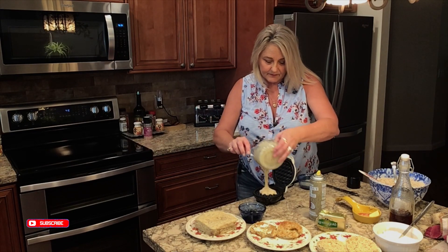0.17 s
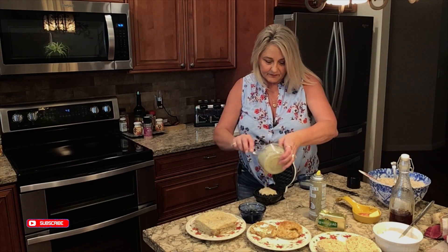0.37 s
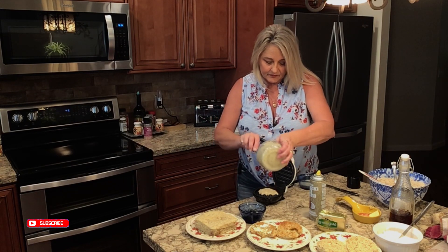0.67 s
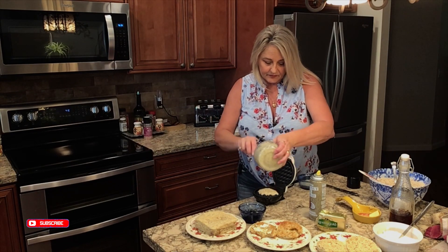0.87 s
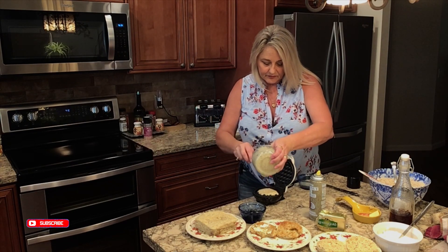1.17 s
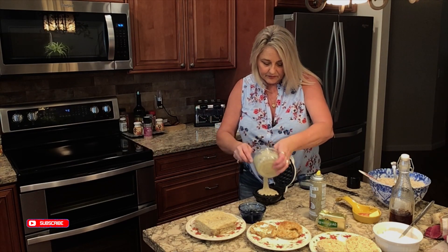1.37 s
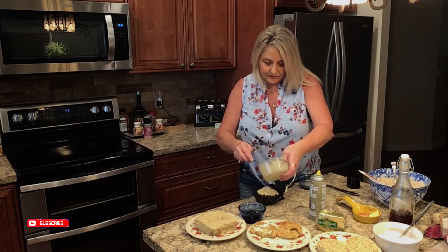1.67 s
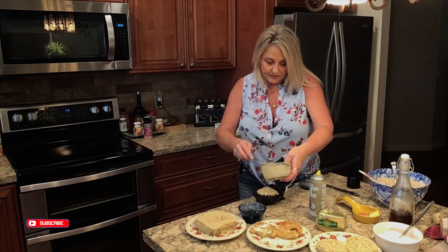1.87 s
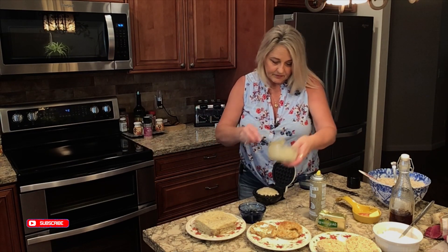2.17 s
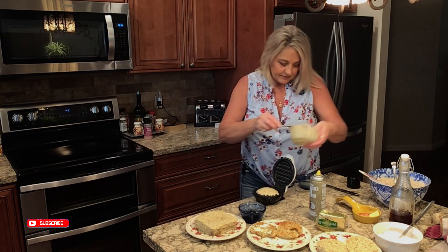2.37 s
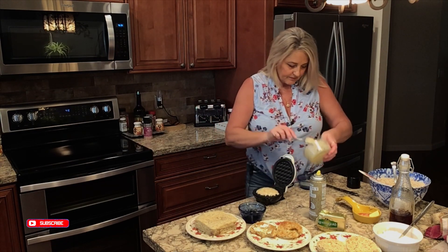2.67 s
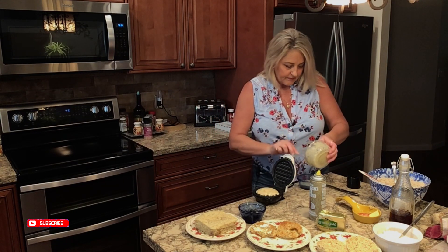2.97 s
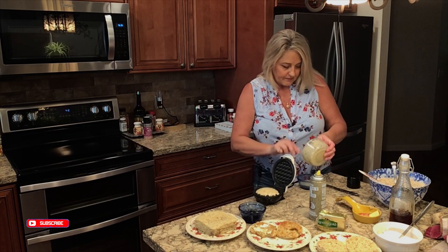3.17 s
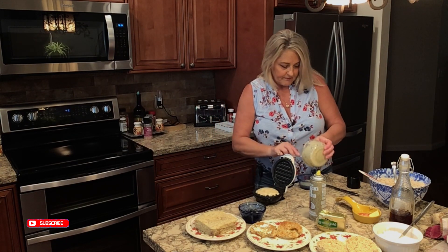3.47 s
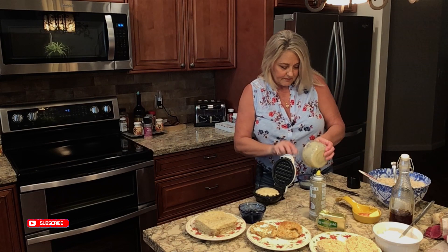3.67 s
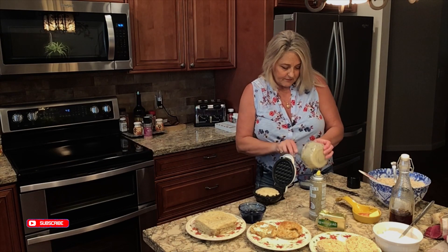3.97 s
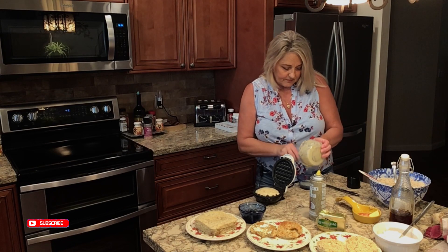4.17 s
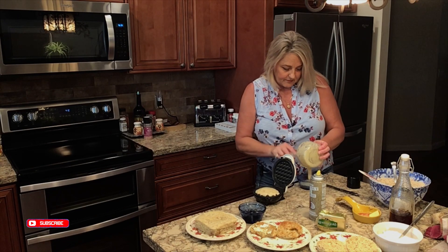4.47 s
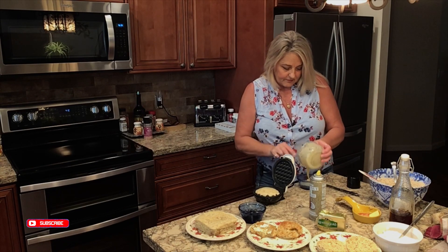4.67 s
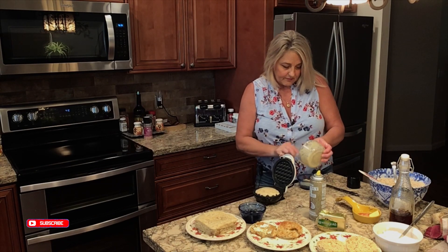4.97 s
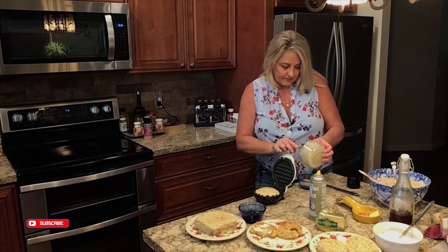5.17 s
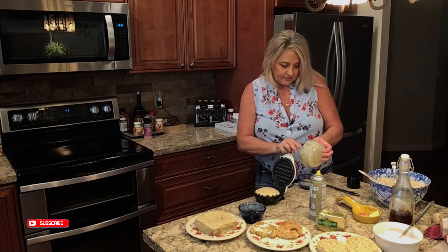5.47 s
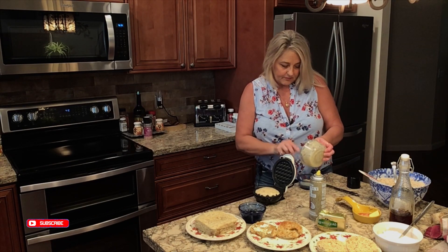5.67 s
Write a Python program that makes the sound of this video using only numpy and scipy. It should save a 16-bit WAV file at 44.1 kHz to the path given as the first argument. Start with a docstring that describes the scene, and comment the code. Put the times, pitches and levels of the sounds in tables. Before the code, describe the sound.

In a kitchen with a low rumble, an appliance hum and a faintly sizzling hot iron, batter is scraped out of a hand-held glass bowl. The spoon starts with quiet squelches and small ticks against the glass, then breaks into uneven clusters of sharp clinks mixed with wet scrapes. The glass rings only briefly, the hard room adds a short tail, and the strongest hits overload the microphone.

```python
"""A soft, wet scrape over appliance hum, low air rumble and the faint sizzle of a hot iron.
A steel spoon is working round a small hand-held glass bowl lined with batter: its edge slips on the glass,
the batter squelches, and each knock rings the bowl, lightly at first, then harder and busier.
Hand and batter damp the glass, so the hard kitchen carries the tail. The loudest clinks overload and clip."""
import sys
import numpy as np
from scipy import signal
from scipy.fft import rfft, irfft, next_fast_len
from scipy.io import wavfile

SR = 44100
rng = np.random.default_rng(int(sys.argv[2]) if len(sys.argv) > 2 else 0)


def inscribe(sig):
    """Save sig as 16-bit PCM at rate SR to the path in sys.argv[1].

    A 1-D sig is mono; a 2-D sig holds one channel per row.
    Samples are clipped to [-1, 1] before scaling.
    """
    pcm = np.round(np.clip(np.atleast_2d(sig).T, -1, 1) * 32767)
    wavfile.write(sys.argv[1], SR, pcm.astype(np.int16))


N = 257103


def gain_of(db):
    """Decibels to a gain."""
    return 10 ** (np.asarray(db) / 20)


def unit_rms(x):
    """Scales to rms 1."""
    return x / np.sqrt(np.mean(x ** 2) + 1e-20)


def curve_at(points, hz):
    """Reads a curve on a log-frequency axis."""
    f, value = np.transpose(points)
    return np.interp(np.log(hz + 1), np.log(f + 1), value)


def add(mix, start, sound):
    """Mixes a sound in, start seconds along."""
    part = mix[round(start * SR):][:len(sound)]
    part += sound[:len(part)]


def coloured_noise(colour):
    """Steady noise at rms 1, shaped by (frequency [Hz], relative level [dB]) points."""
    size = next_fast_len(N)
    shape = gain_of(curve_at(colour, np.fft.rfftfreq(size, 1 / SR)))
    return unit_rms(irfft(rfft(rng.standard_normal(size)) * shape, size)[:N])


def resonate(x, hz, width_hz):
    """A resonance that can glide: shifts hz down to zero, smooths, and shifts back."""
    carrier = np.exp(2j * np.pi * np.cumsum(hz * np.ones(len(x))) / SR)
    pole = np.exp(-np.pi * width_hz / SR)
    return 2 * (carrier * signal.lfilter([1 - pole], [1, -pole], x / carrier)).real


def scrapes(slips_per_s=500, pops_per_s=150, press_share=0.21, lift_db=-8):
    """Tiny slips of the spoon edge make the glass hum; wet pops of batter sound in the bowl's hollow."""
    # Strokes through batter: (start [s], length [s], squelch [dB], its first pitch [Hz], last pitch [Hz],
    # rim hum [dB], its pitch [Hz], upper ring [dB], its pitch [Hz], wet hiss [dB])
    strokes = [(0.0, 0.042, -48.5, 864, 1030, -46, 1660, -57.5, 3030, -68),
               (.23, 0.1, -55.5, 1020, 1090, -65, 1840, -71, 3170, -61),
               (.48, 0.11, -39.5, 1150, 1135, -54, 1830, -50.5, 3610, -72),
               (0.589, 0.17, -49.5, 1190, 1180, -53.5, 1950, -51, 3590, -72),
               (0.786, 0.12, -57, 890, 940, -60, 1950, -59, 3270, -68),
               (1.248, 0.06, -50.5, 1010, 980, -51, 1760, -49.5, 3400, -56),
               (1.33, .13, -55.5, 1070, 1090, -54, 1700, -56, 3370, -72),
               (1.499, 0.18, -73, 1040, 1050, -61, 1640, -63, 3340, -75),
               (1.658, 0.074, -62, 1100, 1040, -57, 1680, -60.5, 3490, -84),
               (1.98, 0.13, -57.5, 1220, 1250, -66, 1650, -64, 3400, -65),
               (2.19, 0.12, -53, 1260, 1280, -63, 1760, -57, 3500, -72),
               (4.041, 0.016, -27, 1210, 1155, -32, 1810, -49, 3460, -50),
               (4.061, 0.013, -31, 1210, 1180, -53, 1740, -50, 3500, -53.5),
               (4.08, 0.061, -38.5, 1170, 940, -47, 1690, -59, 3470, -51),
               (4.14, 0.11, -44.5, 1070, 980, -48.5, 1780, -49.5, 3470, -50.5),
               (5.242, 0.081, -47, 1070, 1090, -63, 1760, -44.5, 2470, -42),
               (5.496, 0.04, -36, 500, 1420, -69, 1550, -75, 3400, -60),
               (5.539, 0.023, -23.5, 1020, 1120, -58, 1600, -49, 3350, -40),
               (5.555, 0.057, -37, 790, 500, -70, 1700, -57, 3520, -37)]
    # Wet hiss: (frequency [Hz], relative level [dB])
    hiss_colour = [(2000, -28), (4500, 3), (6500, 3), (8500, 3), (11000, -11), (14000, -30)]
    out = np.zeros(N)
    for start, length, squelch_db, from_hz, to_hz, rim_db, rim_hz, upper_db, upper_hz, hiss_db in strokes:
        progress = np.arange(0, length, 1 / SR) / length
        n = len(progress)
        pressure = np.minimum(progress / press_share, 1)
        pressure *= gain_of(lift_db * progress ** 2) * np.minimum((1 - progress) / .1, 1)  # spoon lifts
        slip_draw, slip_size, pop_draw, pop_size = rng.random((SR // 2, 4))[:n].T
        noise = rng.standard_normal(SR // 2)[:n]
        slips = unit_rms((slip_draw < slips_per_s / SR) * (slip_size - .5)) + 0.5 * noise
        rim = resonate(resonate(slips, rim_hz, 200), rim_hz, 570)
        upper = resonate(resonate(slips, upper_hz, 130), upper_hz, 650)
        upper += gain_of(-4.5) * resonate(resonate(slips, 5660, 250), 5060, 540)  # the next ring up
        pops = unit_rms((pop_draw < pops_per_s / SR) * (pop_size - .5)) + 1.9 * noise
        hollow_hz = from_hz + (to_hz - from_hz) * progress
        squelch = resonate(resonate(pops, hollow_hz, 75), hollow_hz, 340)
        hiss = coloured_noise(hiss_colour)[:n]
        layers = [(squelch_db, squelch), (rim_db, rim), (upper_db, upper), (hiss_db, hiss)]
        add(out, start, pressure * sum(gain_of(db) * unit_rms(x) for db, x in layers))
    return out


def appliance_hum(waver=0.16):
    """Three steady pitches whose level wavers together."""
    # Hum tones: (frequency [Hz], rms level [dB])
    tones = [(59, -49.5), (118, -59.5), (505, -60.5)]
    t = np.arange(N) / SR
    drift = coloured_noise([(1, -10), (6, -3), (12, -72.5)])
    hum = sum(gain_of(db) * np.sqrt(2) * np.sin(2 * np.pi * (hz * t + rng.random())) for hz, db in tones)
    return hum * (1 + waver * drift)


def iron_sizzle():
    """A hot iron sizzles: a thin band of treble noise that swells and fades."""
    # Swells: (time [s], level [dB])
    swells = [(0.0, -56.5), (0.36, -61), (0.49, -53), (0.65, -46.5), (0.73, -43.5), (0.93, -57.5),
              (1.48, -58.5), (1.91, -56.5), (2.46, -60.5), (2.69, -54), (2.9, -53), (4.3, -59), (5.2, -60),
              (5.8, -68)]
    # Sizzle tone: (frequency [Hz], relative level [dB])
    colour = [(4000, -21), (6000, -18), (7000, -9), (8200, -13.5), (9000, -20.5), (11000, -45)]
    return gain_of(np.interp(np.arange(N) / SR, *np.transpose(swells))) * coloured_noise(colour)


def air_rumble(level_db=-31.5):
    """Room air: a deep rumble with a little hiss on top."""
    # Room tone: (frequency [Hz], relative level [dB])
    colour = [(3, 2), (18, 3), (25, -10), (31, -20.5), (60, -20.5), (84, -31.5), (118, -27.5), (146, -29.5),
              (281, -32.5), (506, -31), (667, -36), (1240, -40), (2090, -51), (7760, -58), (10500, -60),
              (15500, -71.5)]
    return gain_of(level_db) * coloured_noise(colour)


def clinks(spot_db=4.0, modes_db=-2, glass_gain_db=3, clack_db=-6, patch_db=-1, ripple_db=2.5):
    """Each blow rings the glass, with a dry clack of steel and two brief notes from the struck patch."""
    # Spoon on glass: (time [s], blow [dB], knock [dB], rim ring [dB], second ring [dB], tick [dB],
    # two patch notes [Hz], freedom of the glass to ring [dB]); levels after the blow are relative to it
    blows = [(0.398, -51, -9, 2, -6, -20, 3270, 6000, -14),
             (0.4825, -20.5, -21, -13, -3, -40, 3550, 5730, -22.5),
             (0.621, -34, -8, -27, -8, -35, 3280, 5640, -13.5),
             (0.6623, -42.5, -5, -16, -6, -23, 3420, 5630, -11),
             (0.7185, -43, -9, -18, 1, -25, 4200, 6500, -13),
             (0.767, -17.5, -30, -32, -6.5, -26, 3390, 7220, -34),
             (0.7711, -22, -17, -17.5, 7.5, -19, 3250, 6000, -18.5),
             (0.9356, -33, -23, -34, -9, -33, 4760, 3500, -29),
             (1.209, -58, -3, -6, 9, -22, 3630, 5670, -15),
             (1.2523, -36, -16, -22, -8, -7, 3320, 7800, -24.5),
             (1.4783, -40.5, -10, 7.5, -1, -36, 3400, 5370, -16),
             (1.578, -52, -4, -3, 6, -23, 3250, 5600, -15), (2.266, -53, -6, 1, 2, -19, 3520, 6230, -9),
             (2.369, -54, 3, 0, 5, -19, 3450, 5530, -10),
             (2.3844, -44.5, -12, 1.5, 7, -19, 3350, 5550, -15),
             (2.709, -5.5, -14, -18, -7.5, -26, 5510, 5700, -18),
             (2.7154, -12.5, -22, -6.5, -4.5, -36, 3940, 5700, -7.5),
             (2.807, -14, -6, -11, 6, 1.5, 4980, 5900, -29),
             (2.8161, -19.5, -12, -24, -13, -19, 5070, 5800, -21),
             (2.8249, -41, 4, -14, -6, 4, 4930, 5350, 3), (2.8592, -7, -26, -57, -6, -5, 3840, 6260, -35.5),
             (2.8658, -14.5, -14.5, -28, 0, -33, 3910, 6100, -17.5),
             (3.0871, 7, -39, -13.5, -8.5, -31, 3420, 6050, -19),
             (3.1, 0.5, -28, -19, -6.5, -4, 3520, 6050, -10.5),
             (3.3951, -13, -11, -46.5, -11, -2.5, 4830, 5230, -18),
             (3.4016, -15.5, -20.5, -34.5, -3.5, -7.5, 4360, 6200, -37.5),
             (3.436, -33.5, -18.5, -31, -12, -6, 4340, 6550, -15),
             (3.4614, -13, -32.5, -34.5, -18, -14.5, 4930, 6720, -36),
             (3.4762, -23, -15, -21, 5, -12, 4470, 7600, -39),
             (3.617, 4, -30, -13.5, -25.5, -32.5, 4100, 5360, -3.5),
             (3.6208, 1, -38.5, -16, -27, -22, 7980, 5420, -12.5),
             (3.7283, 8.5, -14, -36, -7.5, -9.5, 5496, 6870, -13.5),
             (3.7306, -4, -11.5, -7.5, -8, -30.5, 3550, 7010, -7.5),
             (3.7421, 1.5, -33.5, -17.5, -21, -36.5, 3660, 5530, -18),
             (3.869, -24.5, -39, -32.5, -15, -1, 7600, 8850, -25),
             (3.9384, 8, -28, -23.5, -8.5, -14, 7944, 5806, -14.5),
             (4.0056, -3.5, -41, -25, -12.5, -41.5, 3790, 5600, -29),
             (4.021, -13, -28.5, -20, -14, -12, 3380, 7540, -24),
             (4.46, -16, -38, -29.5, -7.5, 4, 4300, 7000, -31),
             (4.488, -39, -1, -11, -12, -19.5, 4280, 6000, -23),
             (4.542, -25.5, -27.5, -35, -16, 5, 2800, 7700, -24.5),
             (4.556, -12.5, -15, -38, 2, 1.5, 5030, 6100, -33.5),
             (4.5612, -24, -9, -55, -8.5, -30, 2840, 5240, -6.5),
             (4.566, -35, -29, -43.5, -10, -15, 5030, 5500, -17),
             (4.6223, -15.5, -29, -27, -0.5, -7, 9000, 6950, -21.5),
             (4.633, -19, -26, -42, -1, -6, 4520, 7200, -32),
             (4.815, 7, -28.5, -18.5, -6.5, -19, 3290, 7950, -19),
             (4.8262, -13.5, -40, 0, -24.5, -32, 5430, 7900, -26),
             (4.8965, -26, -9, -16, 0, 9, 4970, 8260, -11),
             (5.2162, -7, -10, -27, -5, 0, 4750, 7950, -24.5),
             (5.2215, -11, 0, -27, 2.5, 5, 2540, 5040, -30.5),
             (5.3471, -6.5, -26.5, -47, -7.5, -3, 3540, 7260, -36),
             (5.465, -20, -6, -21, 2, 10, 5000, 6400, -22.5),
             (5.4776, -12.5, -7.5, -25.5, -6, -10, 4800, 8600, -24),
             (5.6129, -5, -20, -68, -6, -2.5, 3400, 6340, -26),
             (5.6235, -7, -39, -53, -16, -27, 3440, 6900, -25),
             (5.638, -24, -30, -43, -3, 0, 4430, 6600, -29),
             (5.763, -11, -3, -36, -17.5, 2, 4680, 6650, -20),
             (5.817, -33, -30, -18, -5, -10, 2520, 5800, -29),
             (5.8202, -8, -27, -22, -0.5, -13, 3430, 5840, -21),
             (5.826, -14.5, -25, -17, 0, -9, 3400, 8100, -14.5)]
    # Tone bands of a blow: (thud, knock, rim, clack, second ring, blow, upper rings, tick) [Hz]
    band_hz = [250, 900, 1670, 2500, 3600, 5800, 7700, 11000]
    # Modes of bowl and spoon: (frequency [Hz])
    mode_hz = [190, 350, 520, 720, 1050, 1670, 2500, 3315, 3580, 3830, 4200, 4900, 5310, 5415, 5590, 5895,
               6105, 6300, 6870, 7870, 8150, 8280]
    # Ring of each mode: (relative level [dB], base t60 [s])
    mode_ring = [(0.5, 0.032), (9, 0.029), (3, 0.042), (-5.5, 0.042), (10.5, 0.015), (5, 0.053),
                 (3.5, 0.033), (14, 0.025), (4, 0.021), (0.5, 0.035), (5.5, 0.033), (4, 0.023),
                 (-2.5, 0.0076), (8, 0.031), (-2.5, 0.031), (18, 0.0081), (-3, 0.019), (4, 0.017),
                 (2.5, 0.02), (6, 0.017), (12, 0.021), (1, 0.011)]
    hz = np.array(mode_hz)
    mode_db, mode_t60 = np.transpose(mode_ring)
    clack_base_t60, patch_base_t60 = .022, .016  # s
    t, bins = np.arange(8192) / SR, np.fft.rfftfreq(8192, 1 / SR)
    attack = 1 - np.exp(-t / 0.000043)
    out = np.zeros(N)
    for start, blow_db, knock, rim, second, tick, note_a_hz, note_b_hz, freedom_db in blows:
        thud = -24.5 + 0.85 * knock - 0.63 * blow_db  # a heavy contact thuds; a hard blow is mostly treble
        mid = -17.5 + 0.073 * tick - 0.51 * blow_db
        upper = 3 + 0.11 * tick
        tone = list(zip(band_hz, [thud, knock, rim, mid, second, 0, upper, tick])) + [(15500, tick - 18)]
        ring_stretch = 0.87 + .002 * blow_db  # harder blows ring slightly longer
        fall = 60 * t / ring_stretch  # over a base t60, this is the decay in dB

        spot, phase = rng.standard_normal((2, len(hz)))  # each contact spot favours other modes
        level_db = modes_db + mode_db + curve_at(tone, hz) + spot_db * spot
        level_db += (glass_gain_db + freedom_db) * (hz > 2000)
        envelopes = gain_of(level_db[:, None] - fall / mode_t60[:, None])
        rings = envelopes * np.sin(2 * np.pi * hz[:, None] * t + 2 * phase[:, None])

        ripple = ripple_db * np.interp(bins, np.linspace(0, SR / 2, 40), rng.standard_normal(40))
        clack_colour = gain_of(curve_at(tone[:2] + tone[3:], bins) + ripple)  # skips the rim band
        clack = irfft(rfft(rng.standard_normal(len(t))) * clack_colour)
        clack *= gain_of(clack_db - fall / clack_base_t60)

        notes = sum(gain_of(curve_at(tone, f)) * np.sin(2 * np.pi * f * t) for f in (note_a_hz, note_b_hz))
        patch = gain_of(patch_db - fall / patch_base_t60) * notes
        add(out, start, gain_of(blow_db) * attack * (rings.sum(0) + clack + patch))
    return out


def kitchen_reverb(x, tail_db=-12.5):
    """Single echoes off counter and cupboards, then sparse random ones, each band dying at its own speed."""
    # Room decay: (frequency [Hz], t60 [s])
    decay = [(250, 0.1), (700, 0.62), (1700, 0.6), (4500, 0.57), (8300, 0.56), (9500, 0.48), (14000, 0.12)]
    # Tail tone: (frequency [Hz], relative level [dB])
    colour = [(300, -1.5), (1500, 6), (8300, -1), (9500, -2), (14000, 10)]
    # Early reflections: (delay [s], level [dB])
    echoes = [(.0065, -21.5), (0.013, -20.5), (0.017, -32), (0.0255, -30.5), (.03, -31.5), (0.043, -45.5)]
    taps = np.zeros(SR)
    slots = np.arange(200, SR - 20, 20)
    taps[slots + rng.integers(0, 20, len(slots))] = rng.choice([-1., 1.], len(slots))
    hz, t, bands = signal.stft(taps, SR, nperseg=256)
    bands *= gain_of(curve_at(colour, hz)[:, None] - 60 * t / curve_at(decay, hz)[:, None])
    bands *= 1 - np.exp(-t / 0.0017)  # the diffuse field takes a moment to build
    tail = signal.istft(bands, SR, nperseg=256)[1]
    response = gain_of(tail_db) * tail / np.linalg.norm(tail)
    for delay, db in echoes:
        add(response, delay, gain_of([db]))
    return signal.fftconvolve(x, response)[:N]


def scene():
    """Spoon and bowl in the kitchen, over a bed of hum, sizzle and air; mono."""
    bowl = clinks() + scrapes()
    return (bowl + kitchen_reverb(bowl) + appliance_hum() + iron_sizzle() + air_rumble())[None]


def record(dry):
    """Loud blows clip at full scale; a steep low-pass then trims the top."""
    cutoff_hz = 15700
    lowpass = signal.firwin(511, cutoff_hz, window=("kaiser", 9), fs=SR)
    return signal.oaconvolve(np.clip(dry, -1, 1), lowpass[None], "same")


dry = scene()
out = record(dry)
inscribe(out)
```